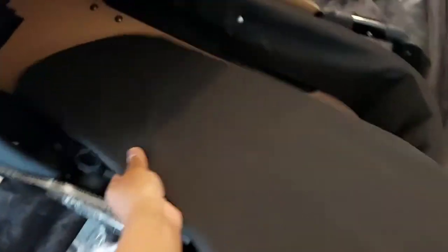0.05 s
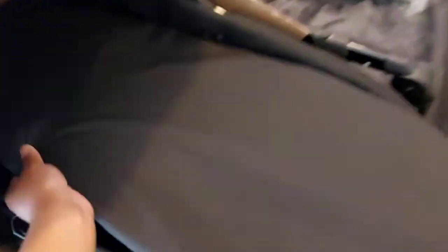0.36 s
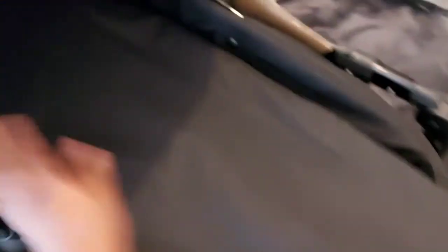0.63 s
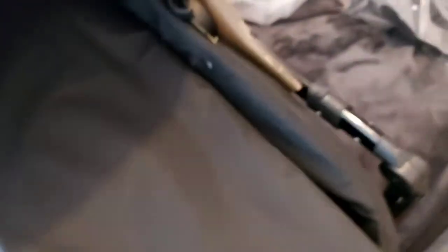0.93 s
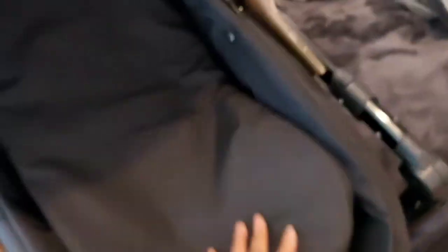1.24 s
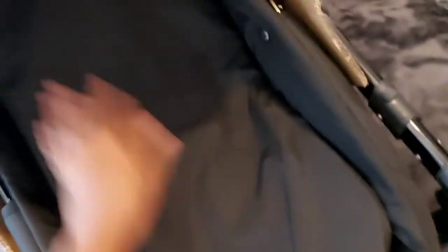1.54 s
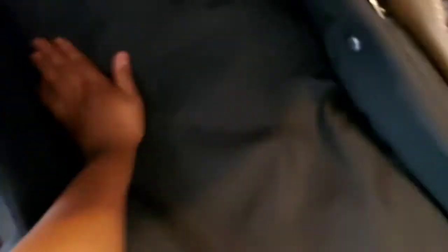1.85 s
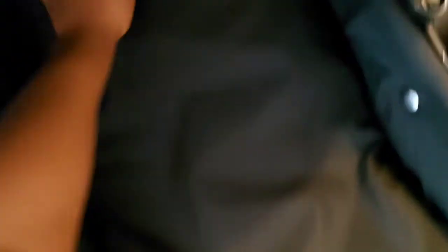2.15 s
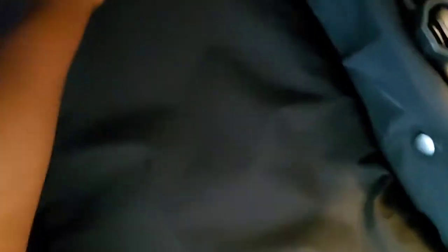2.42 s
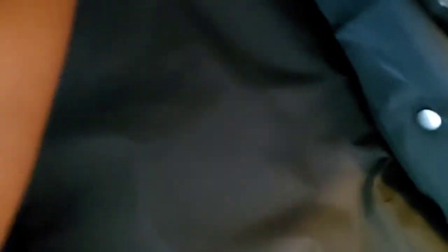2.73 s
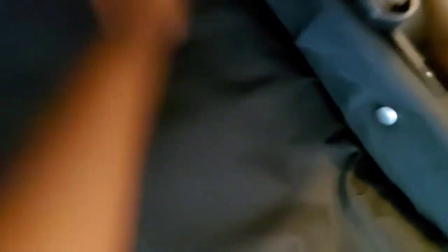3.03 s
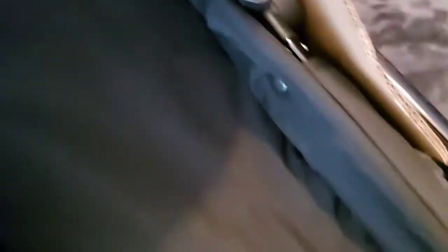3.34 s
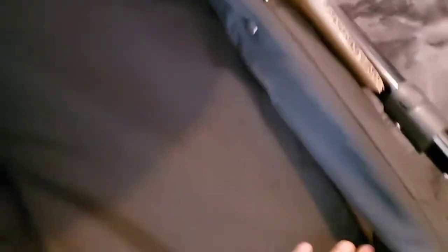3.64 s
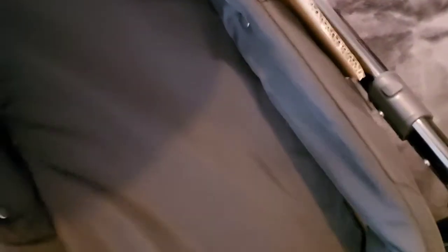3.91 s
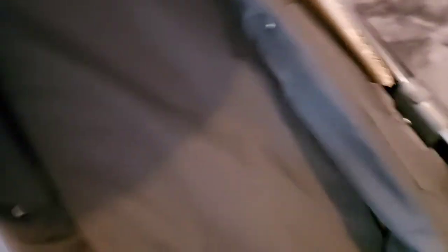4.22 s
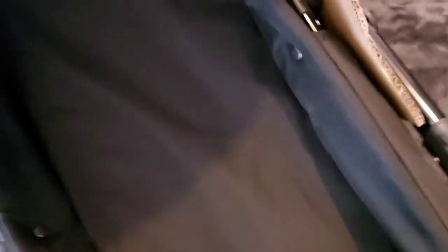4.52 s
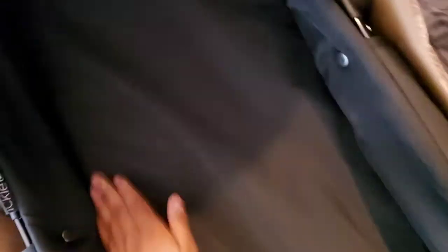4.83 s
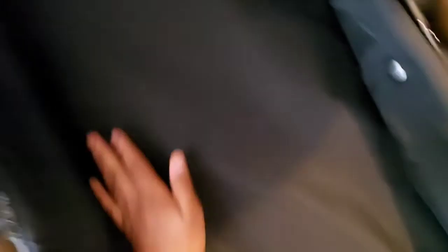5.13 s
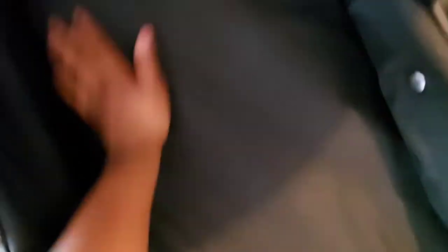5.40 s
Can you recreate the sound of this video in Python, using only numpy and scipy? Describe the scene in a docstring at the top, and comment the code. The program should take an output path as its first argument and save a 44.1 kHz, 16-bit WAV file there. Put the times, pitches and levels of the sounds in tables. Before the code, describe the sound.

Close up indoors, a hand rubs and pats a cloth-covered mattress in a baby carrier, with hissing swishes and soft, hollow knocks.

```python
"""Close up, a hand smooths and pats a cloth-covered mattress into a baby carrier. It opens with fast
slides that zip over the ribs of the cloth; each stroke hisses on the weave and rumbles in the padding.
Pats start to knock the padded shell, plastic wrapping ticks, and just after 1 s moving air buffets the
left microphone port. Two hard pats land near 2.3 s and a bright zip follows near 3.3 s with two soft
pops of air, then more strokes and pats settle the mattress."""
import sys
import numpy as np
from scipy import signal
from scipy.fft import rfft, irfft, next_fast_len
from scipy.io import wavfile
from scipy.ndimage import uniform_filter1d, map_coordinates

SR = 44100
rng = np.random.default_rng(int(sys.argv[2]) if len(sys.argv) > 2 else 0)


def log_audio(samples):
    """Write samples as a 16-bit WAV file to the path given in sys.argv[1]."""
    # one column per channel
    frames = np.atleast_2d(samples).T
    # limit to full scale, then quantise
    limited = np.clip(frames, -1, 1)
    pcm = np.round(limited * 32767).astype(np.int16)
    wavfile.write(sys.argv[1], SR, pcm)


N = 245457
T = np.arange(N) / SR
BIN_HZ = np.fft.rfftfreq(N, 1 / SR)


def from_db(db):
    """Decibels to gain."""
    return 10 ** (np.asarray(db) / 20)


def unit(x):
    """Scales to rms 1."""
    return x / np.sqrt(np.mean(x ** 2) + 1e-20)


def curve(points):
    """Draws a curve through points on a log-frequency axis, one value a bin."""
    hz, value = np.transpose(points)
    return np.interp(np.log(BIN_HZ + 1), np.log(hz + 1), value)


def add(mix, start_s, sound):
    """Mixes a sound in at start_s."""
    part = mix[..., round(start_s * SR):][..., :sound.shape[-1]]
    part += sound[..., :part.shape[-1]]


def wander(rate_hz):
    """A random drift of rms 1, moving at up to about rate_hz."""
    size = next_fast_len(N)
    hz = np.fft.rfftfreq(size, 1 / SR)
    return unit(irfft(rfft(rng.standard_normal(size)) / (1 + (hz / rate_hz) ** 4), size)[:N])


def coloured(x, eq):
    """Applies an EQ curve that rolls off beyond its ends; rms 1."""
    roll_off = np.minimum(BIN_HZ / eq[0][0], 1) ** 2 / np.maximum(BIN_HZ / eq[-1][0], 1) ** 2
    return unit(irfft(rfft(x) * from_db(curve(eq)) * roll_off, N))


def swell(start_s, rise_s, fall_s, hold, speed_power=1.35):
    """A push grows louder with speed, then falls 40 dB in fall_s; hold over 1 lingers at the peak."""
    speed = np.sin(np.pi / 2 * np.clip((T - start_s) / rise_s, 0, 1))
    slowing = np.clip((T - start_s - rise_s) / fall_s, 0, 10)
    return speed ** speed_power * from_db(-40 * slowing ** hold)


def room_tone(level_db=-82):
    """The still room: a faint, dark bed of noise."""
    # colour of the quiet: freq_hz, gain_db
    tone_eq = [(20, 1), (100, 10), (400, -8), (1500, -5), (5000, -50), (16000, -36)]
    return from_db(level_db) * coloured(rng.standard_normal((2, N)), tone_eq)


def room_tail(x, wet_db=-19, t60_s=0.3):
    """A small furnished room answers with a faint, short tail."""
    t = np.arange(SR // 3) / SR
    tail = rng.standard_normal((2, len(t))) * from_db(-60 * t / t60_s) * (t > .004)
    return from_db(wet_db) * signal.fftconvolve(x, tail / np.linalg.norm(tail[0]), axes=1)[:, :N]


def carrier_echoes(x, echo_db=-10, latest_s=.009, above_hz=900, count=7):
    """The sides of the carrier throw back a few close echoes that comb the treble."""
    delays_s = rng.uniform(0.001015, latest_s, (count, 2, 1))
    comb = sum(np.exp(-2j * np.pi * BIN_HZ * delay) for delay in delays_s) / np.sqrt(count)
    low_cut = BIN_HZ / np.hypot(BIN_HZ, above_hz)
    return from_db(echo_db) * irfft(rfft(x) * comb * low_cut, N)


def mic_ports(pair):
    """Places the hand in stereo: row 0 reaches both ports, slightly apart in time; row 1 only the right."""
    # the hand's direction, as a head start at the left port: time_s, lead_s
    hand_path = [(0, .00015), (.55, .00023), (.9, 0), (1.55, .00024), (2.25, .00015), (3.05, .00012),
                 (3.55, -.0001), (4.35, .0002), (5.55, .00015)]
    # how alike the ports sound: freq_hz, likeness (clipped to 0-1)
    port_likeness = [(50, 0.1), (150, 2.8), (350, 0.86), (700, 1.1), (1400, 0.2), (2800, 0.19),
                     (6000, 0.36), (15000, -1.84)]
    # tilt between the ports: freq_hz, left_minus_right_db
    port_balance = [(60, 0.5), (400, 0.9), (800, 2.5), (1300, 0.5), (2400, 0), (3400, 2), (5000, -1),
                    (7000, -5.5), (8100, -3.5), (9400, 4.5), (10700, 3), (12500, 1), (15000, -1.5)]
    lead_s = np.interp(T, *np.transpose(hand_path))
    delayed = map_coordinates(pair[0], [(T - lead_s) * SR], order=5, mode="nearest")
    left, right_only = rfft(pair)
    likeness = np.clip(curve(port_likeness), 0, 1)
    right = likeness * rfft(delayed) + np.sqrt(1 - likeness ** 2) * right_only
    pan_db = curve(port_balance) / 2
    return irfft(np.array([left * from_db(pan_db), right * from_db(-pan_db)]), N)


def draught(right_db=-21, evenness=0.41):
    """Eddies of pushed air tumble over the left port and barely touch the right."""
    # gusts of air: start_s, rise_s, fall_s, level_db
    gusts = [(1.151, .11, 0.099, -23), (1.3, 0.096, 0.28, -31), (1.584, 0.025, 0.094, -38)]
    # colour of the buffeting: freq_hz, gain_db
    buffet_eq = [(20, -28), (40, -8.5), (65, 4.5), (115, 2.5), (170, -9.5), (260, -13), (350, -29.5),
                 (600, -27.5), (1500, -90)]
    gain = sum(from_db(db) * swell(*timing, hold=2.24) for *timing, db in gusts)
    eddies = coloured(rng.standard_normal((2, N)), buffet_eq)
    strength = uniform_filter1d(abs(signal.hilbert(eddies)), size=900)
    return unit(eddies / strength ** evenness) * gain * from_db([[0], [right_db]])


def eddy_pops(half_s=0.0023):
    """An eddy crosses a port: one quick dip and rise of pressure."""
    # single eddies: centre_s, left_db, right_db
    pops = [(1.251, -18, -50), (1.282, -13.5, -50), (1.308, -18.5, -48), (1.614, -31, -35),
            (1.67, -61, -35.5), (3.184, -57, -28.5), (3.257, -26.5, -33)]
    out, u = np.zeros((2, N)), np.arange(-4, 4, 1 / (half_s * SR))
    pulse = u * np.exp((1 - u ** 2) / 2)
    for centre_s, *port_db in pops:
        add(out, centre_s - 4 * half_s, from_db(port_db)[:, None] * pulse)
    return out


def crinkling(t60_s=0.0066, half_width_octaves=0.54):
    """A crease in the plastic wrapping flips over with a dry tick a few milliseconds long."""
    # snapping creases: start_s, level_db, pitch_hz
    creases = [(0.925, -59, 7250), (.9527, -53, 11500), (1.193, -32, 1670), (1.201, -36.5, 2000),
               (2.2608, -30.5, 1500), (3.797, -58, 4700), (4.2632, -40, 1010), (4.4003, -45.5, 1350),
               (4.735, -42, 1170)]
    out, t = np.zeros((2, N)), np.arange(2048) / SR
    for start_s, level_db, pitch_hz in creases:
        band_hz = np.minimum(pitch_hz * 2 ** (half_width_octaves * np.array([-1, 1])), .45 * SR)
        snap = rng.standard_normal((2, len(t))) * from_db(-60 * t / t60_s)
        tick = signal.lfilter(*signal.butter(2, band_hz, "bandpass", fs=SR), snap)
        attack_rms = tick[:, :SR // 300].std(axis=1, keepdims=True)
        add(out, start_s, from_db(level_db) * tick / attack_rms)
    return out


def zipping(jitter_hz=200, flutter_db=3, flutter_hz=160, overtone_db=-13):
    """Ribs of the weave tick past so fast that they sing; an uneven hand smears the pitch into a rasp."""
    # fast slides, one glide each: start_s, length_s, first_hz, middle_hz, last_hz, level_db, jitter_share
    slides = [(0, 0.08, 1806, 1210, 920, -45.5, 0.023), (0.206, 0.17, 1036, 2200, 1850, -48.5, 0.068),
              (.32, 0.18, 2137, 2050, 1780, -44, 0.27), (3.182, .14, 5950, 4400, 3670, -37.5, .06),
              (3.312, .034, 3610, 3380, 3110, -31, .025), (3.327, .16, 3300, 2490, 2160, -44, 0.072)]
    out = np.zeros((2, N))
    for start_s, length_s, *glide_hz, level_db, jitter_share in slides:
        progress = np.clip((T - start_s) / length_s, 0, 1)
        pitch_hz = np.exp(np.polyval(np.polyfit([0, .5, 1], np.log(glide_hz), 2), progress))
        gain = from_db(level_db) * np.sin(np.pi * progress)
        for side in out:
            phase = 2 * np.pi * np.cumsum(pitch_hz * (1 + jitter_share * wander(jitter_hz))) / SR
            tone = np.sin(phase) + from_db(overtone_db) * np.sin(2 * phase)
            flutter = from_db(flutter_db * wander(flutter_hz))
            side += unit(tone * flutter) * gain
    return out


def ring(modes, t, tuning, rise_s):
    """Damped modes ring after a soft contact; peak 1."""
    wave = sum(from_db(db - 60 * t / t60_s) * np.sin(2 * np.pi * hz * ratio * t)
               for (hz, db, t60_s), ratio in zip(modes, tuning))
    wave = wave * (1 - np.exp(-t / rise_s))
    return wave / abs(wave).max()


def patting(slap_t60_s=0.053, slap_rise_s=0.00092, slap_edge_hz=3500, detune=0.066):
    """Each pat slaps the cloth, knocks the shell and thumps the mattress, at a slightly different spot."""
    # pats and nudges: start_s, knock_db, thump_db, slap_db
    pats = [(.455, -41, -62, -62), (.472, -33.5, -63, -62), (.568, -35.5, -50, -43),
            (0.693, -32.5, -56, -53), (0.963, -30.5, -50, -62), (0.984, -28, -37.5, -63),
            (1.312, -23.5, -44, -55), (1.923, -25.5, -24.5, -50), (2.2606, -15.5, -47, -40),
            (2.291, -15.5, -21, -43), (2.852, -24, -40, -58), (3.387, -22.5, -42, -40),
            (3.576, -21, -33, -25.5), (3.979, -32, -48, -64), (4.111, -21, -23.5, -55),
            (4.243, -30.5, -43, -37), (4.264, -33, -51.5, -55), (4.4, -38, -36, -68.5),
            (4.484, -31.5, -64, -56), (4.581, -24.5, -66, -55), (4.888, -49, -42.5, -62),
            (5.003, -18, -24.5, -54), (5.3476, -20, -44, -39), (5.364, -53, -31.5, -52)]
    # modes of the padded shell and of the mattress on it: pitch_hz, level_db, t60_s
    shell = [(270, -19.5, 0.13), (345.6, -2.5, 0.033), (485, -2, 0.018), (612, -2, 0.0097),
             (792, 0.5, 0.0083), (1170, -4, .014), (2270, -20, 0.01)]
    mattress = [(71.5, -9.5, 0.12), (120.4, 1, 0.068), (153, 2, 0.055)]
    out, t = np.zeros((2, N)), np.arange(SR // 4) / SR
    lowpass_pole = np.exp(-2 * np.pi * slap_edge_hz / SR)
    for start_s, knock_db, thump_db, slap_db in pats:
        tuning = 1 + detune * (2 * rng.random(len(shell)) - 1)
        knock = from_db(knock_db) * ring(shell, t, tuning, rise_s=0.0008)
        thump = from_db(thump_db) * ring(mattress, t, tuning, rise_s=0.0027)
        puff = unit(signal.lfilter([1], [1, -lowpass_pole], rng.standard_normal((2, len(t)))))
        slap = puff * from_db(slap_db - 60 * t / slap_t60_s) * (1 - np.exp(-t / slap_rise_s))
        add(out, start_s, slap)
        add(out[0], start_s, -knock - thump)  # one coherent wave, on the row both ports hear
    return out


def friction(eq, snags_per_s, snag_share, snag_spread_db, patchy_db, chatter_db, chatter_hz):
    """Countless fibres slip as a patchy noise, a few threads snag and let go; the contact can chatter."""
    _, _, noise = signal.stft(rng.standard_normal((2, N)), SR, nperseg=512)
    blur = np.outer(np.hanning(11), np.hanning(9))  # one patch, in frequency and time
    patches = unit(signal.oaconvolve(rng.standard_normal(noise.shape[1:]), blur, "same"))
    slips = signal.istft(noise * from_db(patchy_db * patches), SR, nperseg=512)[1][:, :N]
    snag_sizes = from_db(snag_spread_db * np.minimum(rng.exponential(1, N), 4))
    caught = rng.random(N) < snags_per_s / SR
    snags = snag_sizes * caught * rng.standard_normal((2, N))
    texture = np.sqrt(1 - snag_share) * unit(slips) + np.sqrt(snag_share) * unit(snags)
    return coloured(texture * from_db(chatter_db * wander(chatter_hz)), eq)


def rubbing():
    """The palm slides over the cover: hiss from the weave, rasp from folds, rumble from the padding."""
    # strokes of the hand: start_s, rise_s, fall_s, hold, hiss_db, rasp_db, rumble_db
    strokes = [ (-0.145, 0.21, 0.53, 1.97, -48.5, -49.5, -54), (0.176, 0.29, 0.14, 0.73, -37, -45.5, -51.5),
               (0.42, 0.035, 0.35, 1.6, -48, -50, -47), (0.56, 0.11, 0.19, 1.3, -44, -49.5, -49),
               (0.682, 0.058, 0.065, 1.8, -49, -52, -53), (0.778, 0.027, 0.057, 1.2, -56, -66, -59),
               (0.74, 0.035, 0.54, 1.9, -80, -65.5, -62.5), (0.956, 0.013, 0.08, 2.5, -58, -52.5, -48),
               (0.975, 0.035, 0.18, 2.1, -48, -51.5, -50.5), (1.013, 0.177, 0.054, 1.2, -35.5, -40, -43.5),
               (1.145, 0.12, 0.16, 1.5, -34.5, -39, -40), (1.29, 0.078, 0.16, 2.06, -38, -43, -40.5),
               (1.39, 0.065, 0.15, 1.08, -41.5, -44, -44), (1.59, 0.02, 0.42, 1, -70, -70.5, -68),
               (1.738, 0.16, 0.23, 1.85, -30.5, -36, -35.5), (1.965, 0.24, 0.34, 3, -71, -62, -63.5),
               (2.258, 0.0069, 0.17, 1.86, -36, -40.5, -37), (2.305, 0.13, 0.29, 0.68, -50.5, -50.5, -54.5),
               (2.545, 0.019, 0.12, 2, -49.5, -54, -54), (2.56, 0.059, 0.14, 1.76, -42.5, -47.5, -43.5),
               (2.672, 0.097, 0.21, 0.76, -47.5, -50.5, -54), (2.829, 0.019, 0.15, 1.02, -42, -45.5, -39.5),
               (2.866, 0.14, 0.12, 1.5, -45.5, -55.5, -60), (2.981, 0.15, 0.16, 1.9, -33.5, -46.5, -51),
               (3.129, 0.17, 0.22, 1.7, -28.5, -37, -34), (3.33, 0.04, 0.52, 1.3, -42.5, -48, -42.5),
               (3.479, 0.089, 0.11, 2.04, -31, -33.5, -35), (3.616, 0.035, 0.18, 1.4, -49.5, -52, -53.5),
               (3.975, 0.0099, 0.07, 1.8, -53, -52.5, -44), (3.977, 0.087, 0.15, 2, -32, -37, -37),
               (4.11, 0.064, 0.15, 4.07, -43.5, -48, -49.5), (4.313, 0.095, 0.16, 1.9, -49, -63, -57),
               (4.43, 0.053, 0.23, 2.5, -40, -55, -51), (4.47, 0.11, 0.13, 1.28, -39.5, -45, -41.5),
               (4.626, 0.13, 0.25, 0.4, -39, -46, -44.5), (4.878, 0.031, 0.1, 1.5, -45, -55, -56),
               (4.897, 0.1, 0.16, 1.77, -32.5, -43, -36.5), (5.056, 0.15, 0.5, 0.74, -44, -53, -54),
               (5.271, 0.201, 0.35, 0.8, -41.5, -54, -70), (5.34, 0.018, 0.23, 1.37, -38, -42.5, -41)]
    # cloth under a resting hand: hiss_db, rasp_db, rumble_db
    resting_db = [-75.5, -96, -92]
    # colours of weave, folds and padding: freq_hz, gain_db
    hiss_eq = [(1200, -24), (2000, -4.5), (2700, -2.5), (3600, -2), (5000, -1), (7000, -3), (8500, -1),
               (10500, .5), (12500, 1), (14500, -3), (16000, -6)]
    rasp_eq = [(400, -20.5), (650, -8), (850, -2.5), (1150, 1), (1500, -2), (2000, -4), (2600, -5.5),
               (4000, -16.5)]
    rumble_eq = [(25, -48), (55, -5), (110, -10), (150, -3.5), (200, -10), (270, -1), (310, 3), (340, -1),
                 (385, 0), (435, -1.5), (490, -1.5), (570, -3), (750, -9.5), (1200, -19.5)]
    power = from_db(resting_db)[:, None] ** 2
    for start_s, rise_s, fall_s, hold, *layer_db in strokes:  # overlapping strokes add in power
        power = power + np.outer(from_db(layer_db), swell(start_s, rise_s, fall_s, hold)) ** 2
    hiss_gain, rasp_gain, rumble_gain = np.sqrt(power)
    hiss = friction(hiss_eq, snags_per_s=4500, snag_share=0.17, snag_spread_db=3.0,
                    patchy_db=2.28, chatter_db=0.0, chatter_hz=90)
    rasp = friction(rasp_eq, snags_per_s=450, snag_share=0.058, snag_spread_db=4.5,
                    patchy_db=2.5, chatter_db=-0.95, chatter_hz=70)
    rumble = friction(rumble_eq, snags_per_s=250, snag_share=0.073, snag_spread_db=-2.5,
                      patchy_db=2.5, chatter_db=2.0, chatter_hz=45)
    return hiss * hiss_gain + rasp * rasp_gain + rumble * rumble_gain


def scene():
    """Room tone, reflections and moving air, with the handling up front."""
    handling = mic_ports(rubbing() + zipping() + patting() + crinkling())
    space = room_tone() + carrier_echoes(handling) + room_tail(handling)
    return space + draught() + eddy_pops() + handling


def record(dry, low_cut_hz=42, high_cut_hz=15800):
    """The recorder's bass cut and band limit."""
    low_cut = signal.butter(3, low_cut_hz, "highpass", fs=SR, output="sos")
    high_cut = signal.firwin(511, high_cut_hz, window=("kaiser", 9), fs=SR)
    return signal.oaconvolve(signal.sosfilt(low_cut, dry), high_cut[None], "same", axes=1)


dry = scene()
out = record(dry)
log_audio(out)
```